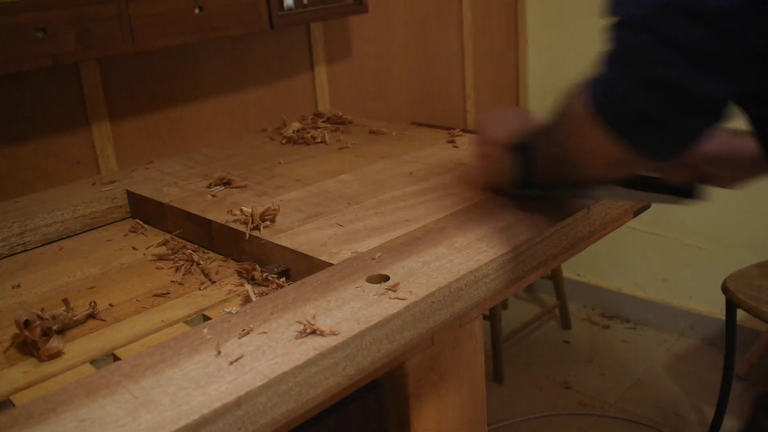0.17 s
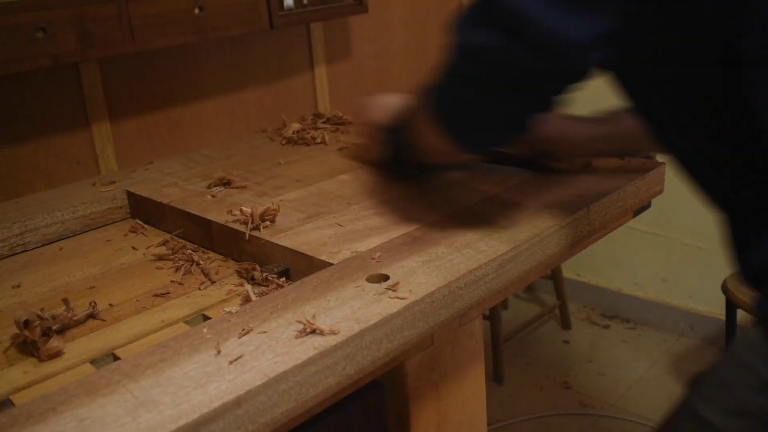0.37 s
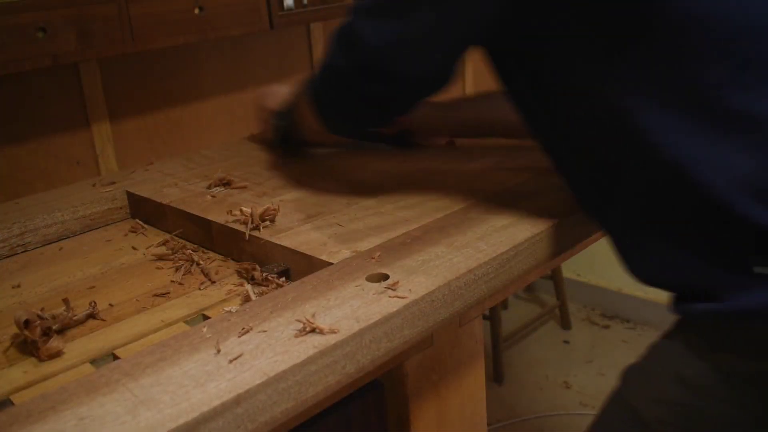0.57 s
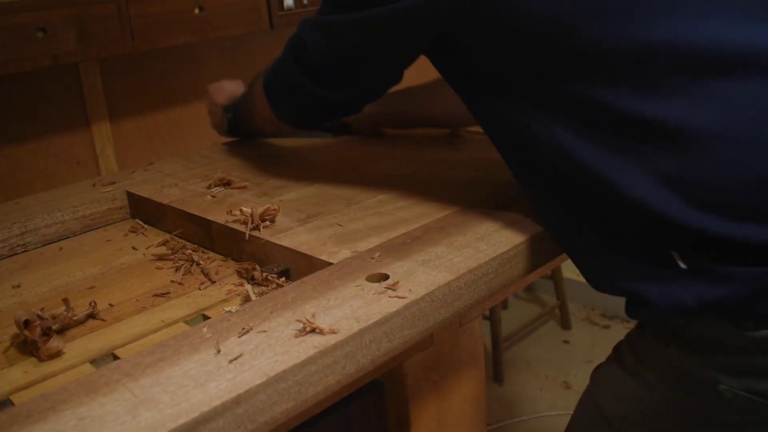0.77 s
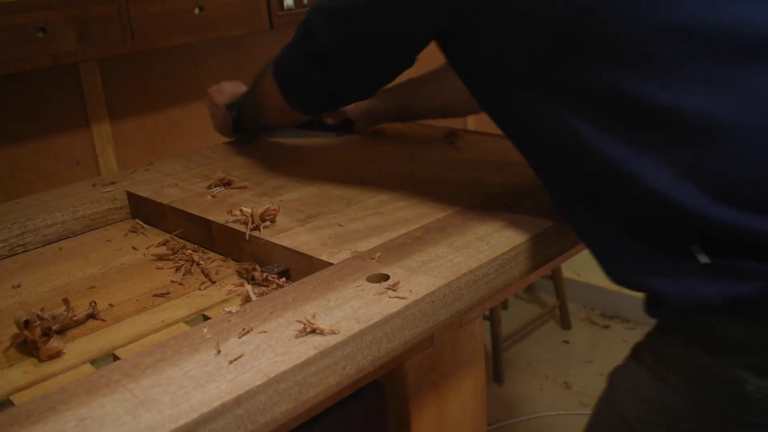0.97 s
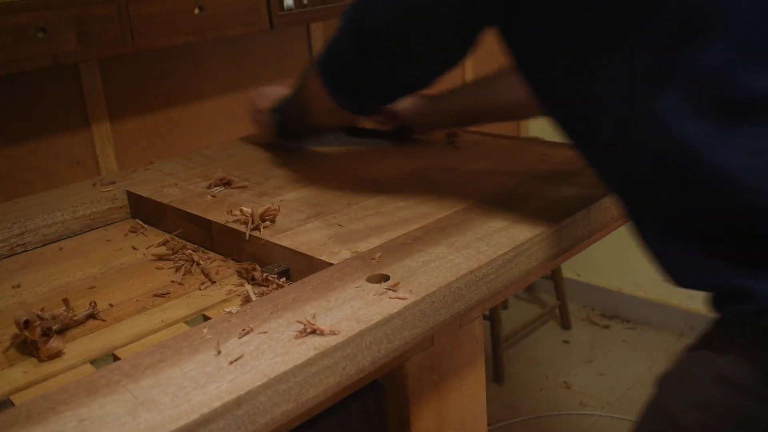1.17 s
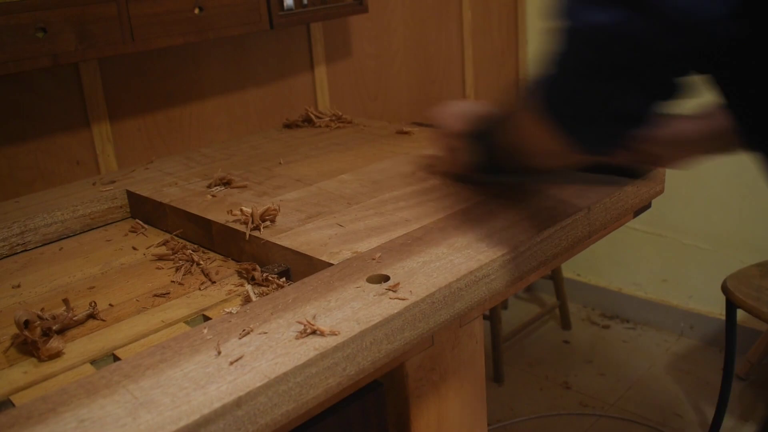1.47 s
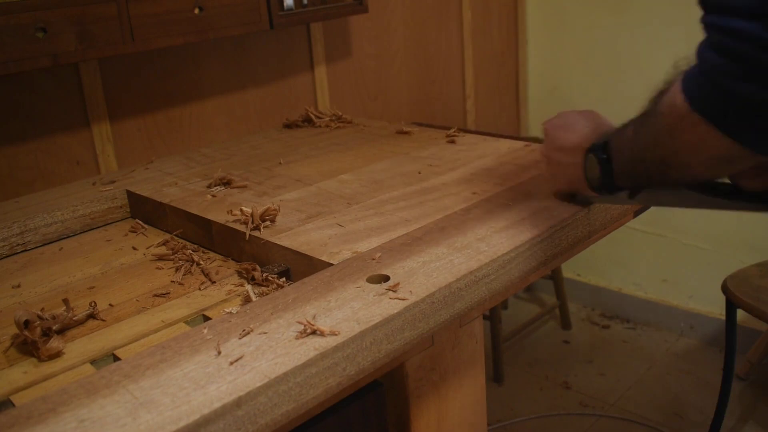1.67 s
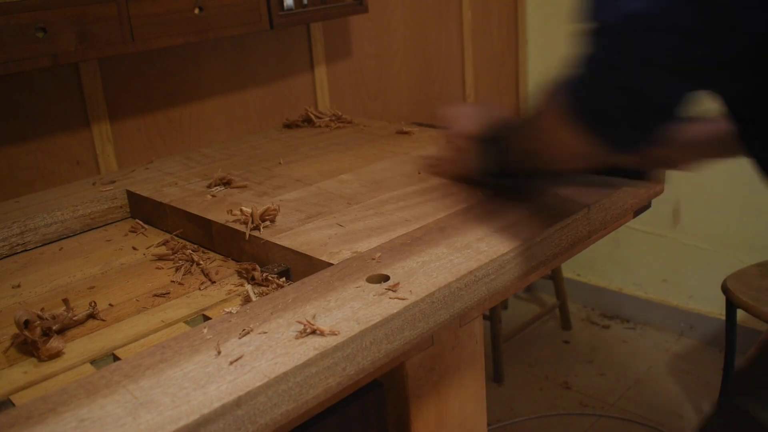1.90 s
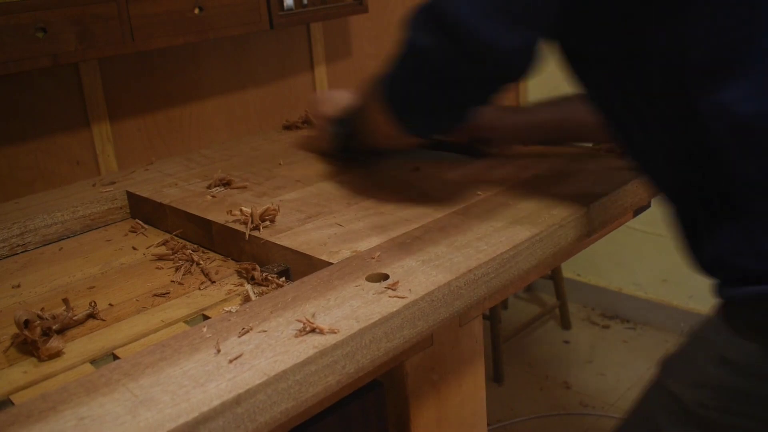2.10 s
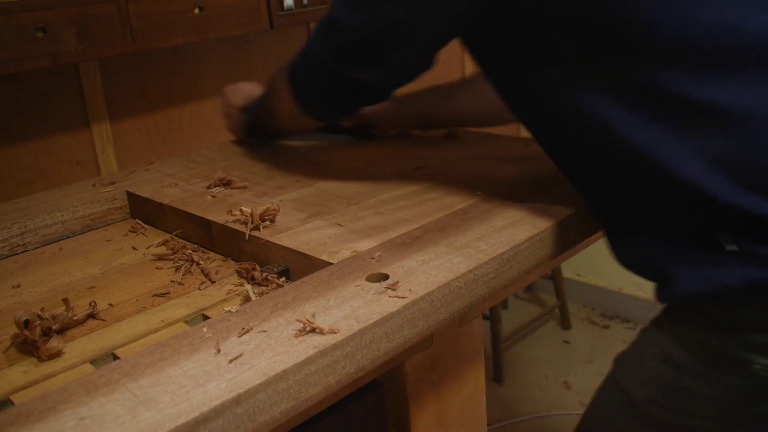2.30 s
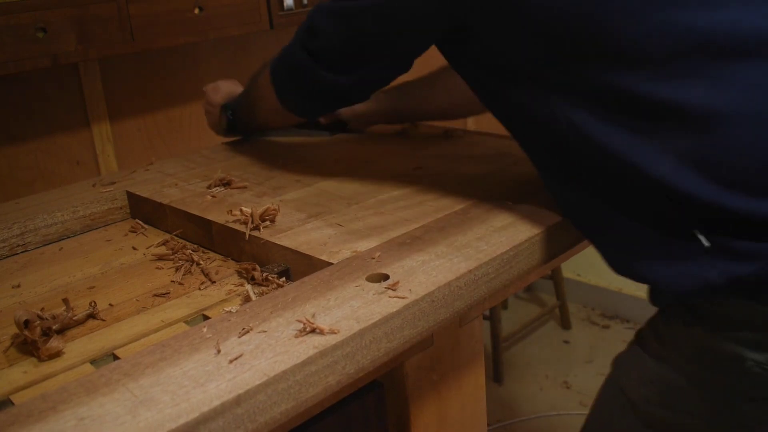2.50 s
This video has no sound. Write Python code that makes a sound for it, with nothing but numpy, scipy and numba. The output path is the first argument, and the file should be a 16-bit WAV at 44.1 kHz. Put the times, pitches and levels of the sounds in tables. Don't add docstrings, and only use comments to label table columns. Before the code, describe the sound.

Close in a small woodworking shop, a plane makes a rough cutting push, nearly stops, drags back with dull clunks, and bites again; chattering boards ring, shavings hiss, and a clear knock lands before the end.

```python
import sys
import numpy as np
from scipy import signal
from scipy.fft import rfft, irfft
from scipy.io import wavfile
from scipy.ndimage import uniform_filter1d
from numba import njit

SR = 44100
rng = np.random.default_rng(int(sys.argv[2]) if len(sys.argv) > 2 else 0)


def rack_gain(trim_db):
    fader = np.asarray(trim_db, float)
    return 10 ** (fader / 20)


def master(y):
    cut = np.clip(np.atleast_2d(y).T, -1, 1)
    pcm = np.round(cut * 32767)
    wavfile.write(sys.argv[1], SR, pcm.astype(np.int16))


N = 116865
T = np.arange(N) / SR

# (time [s], slide level [dB], bite of the iron [dB],
# chatter pitch [Hz], chatter level [dB], sole rumble [dB])
PUSH_STROKE = [
    (0, -30.5, -46, 800, 5.5, 1.5),
    (.06, -39, -37, 850, -2, 12),
    (.17, -36.5, -20.5, 1080, 6, -3),
    (.24, -27, -25.5, 930, 1.5, -17),
    (.4, -27.5, -21.5, 890, -1, -10.5),
    (.58, -26, -19, 1110, -9, -8),
    (.73, -30.5, -23, 890, -2.5, 1.5),
    (.88, -39.5, -31, 880, -9, 3.5),
    (1.0, -70, -27, 840, -9, -3),
]
DRAW_STROKE = [
    (1.04, -48, -28, 900, -3, -7),
    (1.099, -39, -30, 930, -4, -10),
    (1.19, -30.5, -35.5, 990, -2, -14),
    (1.24, -37.5, -25, 750, 3, 0),
    (1.3, -30.5, -28, 740, 0, -1),
    (1.4, -28, -28.5, 735, -10.5, -3),
    (1.55, -29, -29, 1190, -3.5, -3.5),
    (1.67, -30.5, -38, 780, -1, 3),
    (1.79, -45, -38, 850, 4.5, 8.5),
]
SECOND_PUSH = [
    (1.87, -35.5, -32, 830, 1, 2.5),
    (1.95, -30.5, -22.5, 920, 2.9, 4.5),
    (2.04, -29.5, -20.5, 1010, 1.5, 1),
    (2.12, -28.5, -20.5, 920, 1, -12.5),
    (2.23, -27, -24, 1010, -1, -4.5),
    (2.34, -29.5, -24.5, 820, -7, 1.5),
    (2.42, -32.5, -28.5, 940, -4.5, 1),
    (2.56, -46.5, -29, 920, 1, -9),
    (2.65, -94, -28, 800, 6, 1),
]


def strokes():
    rows = np.vstack([PUSH_STROKE, DRAW_STROKE, SECOND_PUSH])
    slide_db, bite_db, chatter_hz, chatter_db, rumble_db = [np.interp(T, rows[:, 0], c) for c in rows[:, 1:].T]
    force = rack_gain(slide_db)
    bite_db = bite_db + 24.5
    lift_db = -9 * near_lifts(width_s=0.022)
    flutter_db = 1.8 * walk(22)
    cut_db = bite_db + lift_db

    slide = sole_slide(np.minimum(cut_db, 3) + flutter_db) + seam_crest(flutter_db)
    boards = board_chatter(force, chatter_hz, chatter_db, rumble_db)
    sway = bench_sway(force * rack_gain(bite_db))
    hiss, other_hiss = shaving_hiss(force, cut_db + flutter_db)
    return force * slide + sway + boards + catches() + hiss, other_hiss


def ticks():
    per_s, scatter_db, most_db, flicker_db = 12000, 2.5, 9, 1.0
    chance, sign, height = rng.random((3, N))
    height_db = np.minimum(-scatter_db * np.log(1 - height), most_db)
    clicks = (chance < per_s / SR) * np.sign(sign - 0.5) * rack_gain(height_db)
    return level(clicks * rack_gain(flicker_db * walk(24.22)), 0)


# (frequency [Hz], level per Hz [dB])
SLIDE_COLOUR = [(59, -67), (100, -69), (220, -14), (342, -51), (450, -12.5), (603, -10.5), (854, -10),
                (3910, -24), (8000, -39.5), (10400, -51), (17600, -120)]
# (frequency [Hz], level [dB], decay time T60 [s])
IRON_MODES = [(1285, 6.5, 0.04), (1433, 8.5, 0.053), (1521, 7, 0.044), (1681, 9, 0.057), (1861, 4, 0.024),
              (2080, 6, 0.046), (2326, 3, 0.037), (2690, 1, 0.061), (2770, -30, 0.035), (3730, -5, 0.021)]


def sole_slide(treble_db):
    scrape = highpass(ripple(colour(ticks(), SLIDE_COLOUR)), 150)
    treble = signal.sosfiltfilt(signal.butter(2, 4630, "high", fs=SR, output="sos"), scrape)
    iron = level(ring(ticks(), IRON_MODES, walk_db=1.5), -2.5)
    return scrape - treble * (1 - rack_gain(treble_db)) + iron


LIFT_TIMES = [.645, 2.283]


def near_lifts(width_s, lead_s=0.0):
    return sum(np.exp(-((T - s + lead_s) / width_s) ** 2) for s in LIFT_TIMES)


def seam_crest(flutter_db):
    hz, width = 3230, 1870
    bright = level(band(band(ticks(), hz, width), hz, width), -6.5)
    return near_lifts(width_s=0.04, lead_s=0.09) * rack_gain(flutter_db) * bright


# (frequency [Hz], level [dB], decay time T60 [s])
BOARD_MODES = [(129, -8.5, 0.27), (189, -7, 0.31), (241, 3, 0.16), (291, -4, 0.02), (438, 6.5, 0.07),
               (560, 1.5, 0.038), (700, 5.5, 0.078), (800, 0.5, 0.07), (871, 1.5, 0.11), (940, 4.5, 0.14),
               (1053.4, 6.5, 0.1), (1130, 0.5, 0.087), (1151.4, 11, 0.17), (1210, 2.5, 0.058)]


def board_chatter(force, chatter_hz, chatter_db, rumble_db):
    width = 500.0

    def chatter():
        return level(svf(svf(ticks(), chatter_hz, width), chatter_hz, width), 0)

    tear = ticks()
    bench_db = -6.5 + 15
    rumble = level(band(tear, 330, 300) + rack_gain(bench_db) * band(tear, 106, 114), 0)
    drive = (chatter() * rack_gain(chatter_db) + rumble * rack_gain(rumble_db)) * force
    loudness = np.std(ring(chatter(), BOARD_MODES))
    return ring(drive, BOARD_MODES, walk_db=1.5) / loudness


# (frequency [Hz], level per Hz [dB])
SHAVING_COLOUR = [(2060, 2), (3500, 0.5), (5720, -17.5), (11500, -23), (14200, -27), (15500, -36)]


def shaving_hiss(force, cut_db):
    grit_db = 2.2 * walk(11.14)
    bite = force * rack_gain(-9 + cut_db + grit_db)
    return [bite * ripple(colour(ticks(), SHAVING_COLOUR)) for _ in range(2)]


def bench_sway(push):
    return push * level(band(rng.standard_normal(N), 35, 50), -40)


# (start [s], length [s], pitch
# [Hz], level [dB])
CATCH_EVENTS = [(0.145, 0.055, 1676, -35), (0.198, 0.09, 700, -25), (0.262, 0.042, 1118, -23),
                (0.331, 0.12, 869, -25.5), (0.361, 0.025, 1148, -25), (0.5, 0.12, 2690, -37.5),
                (0.517, 0.028, 1400, -53), (1.138, 0.08, 980, -40), (1.457, 0.049, 1100, -28.5),
                (1.507, 0.047, 1105, -29.5), (1.522, 0.067, 1553, -34), (1.617, 0.053, 1200, -30),
                (1.545, 0.02, 1155, -29.5), (1.637, .04, 700, -36), (1.84, .03, 1177, -39),
                (1.84, 0.065, 238, -32.5), (1.911, 0.023, 700, -25.5), (1.928, 0.12, 1130, -31),
                (1.936, 0.19, 872, -31), (1.993, 0.035, 2080, -34.5), (2.147, 0.06, 1210, -32),
                (2.328, 0.021, 1080, -30), (0, 0.013, 1117, -26.5), (0.604, 0.01, 978, -17.5),
                (0.63, 0.016, 396, -27.5), (0.672, 0.032, 412, -24), (0.723, .06, 440, -33.5),
                (0.387, 0.075, 700, -33), (0.464, 0.12, 870, -37.5), (0.945, 0.034, 430, -52),
                (1.0, 0.095, 700, -53), (1.837, 0.044, 700, -37), (1.265, .03, 255, -29.5),
                (1.266, 0.022, 437, -27.5), (1.308, 0.033, 547, -30.5), (1.373, 0.028, 543, -24),
                (2.02, 0.046, 1095, -35), (2.259, 0.023, 700, -25), (2.261, 0.033, 420, -27.5),
                (2.322, 0.048, 435, -25), (2.256, 0.028, 255, -29), (1.957, 0.053, 440, -34),
                (2.358, 0.011, 1120, -29), (2.389, 0.042, 426, -29.5), (2.442, 0.061, 435, -34.5),
                (2.103, 0.062, 854, -33), (0.274, .02, 1146, -27.5), (1.55, 0.047, 1700, -35)]


def catches():
    width_hz, edge_s, steadiness = 55, 0.012, 0.8
    out = 0
    tear = ticks()
    for start, length, hz, db in CATCH_EVENTS:
        fade_out = (start + length - T) / 2 + edge_s
        env = np.clip(np.minimum(T - start, fade_out) / edge_s, 0, 1)
        tone = level(band(band(tear, hz, width_hz), hz, 3 * width_hz), 0)
        waver = np.sqrt(uniform_filter1d(tone ** 2, size=SR // 100) + 0.066)
        out = out + env * level(tone / waver ** steadiness, db)
    return out


# (time [s], peak level [dB], pitch [Hz], rattle decay [s], crack level [dB])
KNOCK_EVENTS = [(-.004, -17.5, 525, 0.06, 0), (.208, -21, 900, .02, -2), (0.509, -22.5, 860, .02, -3),
                (.611, -13, 400, 0.012, 2.5), (.617, -8.5, 376, 0.046, -8), (.641, -13, 400, .03, -18),
                (.712, -19, 415, .01, -1), (2.268, -15, 700, 0.035, -15), (.686, -19.5, 387, 0.04, -30),
                (1.163, -29, 700, 0.058, -20), (1.258, -17.5, 400, 0.023, -10),
                (1.272, -16, 440, 0.023, -20), (1.328, -18.5, 510, 0.06, -27),
                (1.384, -19.5, 560, 0.016, -27), (1.603, -15.5, 600, 0.063, -16),
                (1.647, -23, 650, 0.075, -9), (1.822, -20, 690, 0.02, -14), (1.851, -40, 240, 0.042, -14),
                (2.252, -9, 385, 0.04, 0.5), (2.258, -16.5, 432, 0.071, -12),
                (2.328, -20.5, 430, 0.056, -30), (2.41, -22, 438, 0.068, -32)]


def knocks():
    blow_s, crack_s, rattle_db, thud_db = 0.0012, 0.006, -7, -6.5
    lead = SR // 10
    out, t = np.zeros(2 * N), np.arange(SR // 2) / SR
    for s, db, hz, rattle_s, crack_db in KNOCK_EVENTS:
        rattle_noise, crack_noise = rng.standard_normal((2, len(t)))
        blow = np.sin(np.pi * np.clip(t / blow_s, 0, 1))
        push = blow + rack_gain(rattle_db) * rattle_noise * np.exp(-t / rattle_s)
        thud = rack_gain(thud_db) * band(push, 218, 95)
        wood = ring(band(push, hz, 450) + thud + 0.033 * push, BOARD_MODES)
        crack = crack_noise * np.exp(-t / crack_s) * np.clip(t / 0.003, 0, 1)
        for _ in range(3):
            crack = band(crack, 1250, 1400)
        i = int(s * SR) + lead
        out[i:i + len(t)] += rack_gain(db) * (wood / abs(wood).max() + rack_gain(crack_db) * crack / abs(crack).max())
    return out[lead:lead + N]


def room(near):
    lags = np.array([613, 797, 941, 1163, 1327, 1559, 1741, 1987])
    return rack_gain(-7.5) * walls(near, lags, rack_gain(-60 * lags / SR / 0.39), 0.17)


@njit
def walls(x, lags, gain, damp):
    line, soft, out = np.zeros((8, 4096)), np.zeros(8), np.zeros(len(x))
    for i in range(len(x)):
        total = 0.
        for k in range(8):
            soft[k] += (1 - damp) * (gain[k] * line[k, (i - lags[k]) & 4095] - soft[k])
            total += soft[k]
            out[i] += soft[k] * (1 - 2 * (k % 2)) / 3
        for k in range(8):
            line[k, i & 4095] = x[i] + soft[k] - total / 4
    return out


# (frequency [Hz], level per Hz [dB])
SHOP_COLOUR = [(15, -75), (25, -49), (79, -15), (169, 1), (410, 4.5), (482, -10), (665, 1.5), (3000, -15.5),
               (15500, -57)]


def shop_air():
    return level(colour(rng.standard_normal(N), SHOP_COLOUR), -39)


def level(x, db):
    return x * rack_gain(db) / np.sqrt(np.mean(x ** 2))


def walk(rate):
    hold = int(SR / rate)
    steps = np.repeat(rng.standard_normal(N // hold + 1), hold)
    return 0.91 * uniform_filter1d(uniform_filter1d(steps, hold), hold)[:N]


def ring(x, modes, walk_db=0):
    out = 0
    for k, (hz, db, t60) in enumerate(modes):
        r = np.exp(-np.log(1000) / (t60 * SR))
        fed = x * rack_gain(walk_db * walk(8.68)) if walk_db else x
        poles = [1, -2 * r * np.cos(2 * np.pi * hz / SR), r * r]
        out = out + (-1) ** k * rack_gain(db) * (1 - r) * signal.lfilter([1, 0, -1], poles, fed)
    return out


def ripple(x):
    db = 2.5 * np.clip(rng.standard_normal(2000), -2, 2)
    comb_db = np.interp(np.fft.rfftfreq(N, 1 / SR) / 61.14, np.arange(len(db)), db)
    return level(irfft(rfft(x) * rack_gain(comb_db), N), 0)


def colour(x, table):
    hz, db = np.array(table).T
    log_hz = np.log(np.fft.rfftfreq(N, 1 / SR) + 1)
    return irfft(rfft(x) * rack_gain(np.interp(log_hz, np.log(hz), db, left=db[0] - 44)), N)


@njit
def svf(x, hz, width):
    y, b, l = np.empty(len(x)), 0., 0.
    for i in range(len(x)):
        g, k = np.tan(np.pi * hz[i] / SR), width / hz[i]
        v = (b + g * (x[i] - l)) / (1 + g * (g + k))
        b, l, y[i] = 2 * v - b, l + 2 * g * v, k * v
    return y


def band(x, hz, width):
    return svf(x, np.full(len(x), 1. * hz), 1. * width)


def highpass(x, hz):
    return signal.sosfilt(signal.butter(2, hz, "high", fs=SR, output="sos"), x)


def scene():
    plane, other_hiss = strokes()
    near = plane + knocks()
    mid = near + room(near) + shop_air()
    side = rack_gain(-5) * band(other_hiss + shop_air(), 7740, 6900)
    side = side + rack_gain(-54) * band(rng.standard_normal(N), 30, 41)
    side = side + rack_gain(-34) * band(np.roll(mid, 300), 250, 500)
    left_db = 2.5
    return mid * rack_gain(np.array([[left_db / 2], [-left_db / 2]])) + side * np.array([[1], [-1]])


@njit
def duck(x, top, ratio, release):
    g, e = np.empty(len(x)), 0.
    for i in range(len(x)):
        e += (abs(x[i]) - e) * (.02 if abs(x[i]) > e else release)
        g[i] = min(1., (top / (e + 1e-9)) ** (1 - 1 / ratio))
    return g


def top_cut(x):
    return signal.sosfilt(signal.butter(12, 15630, fs=SR, output="sos"), x)


def record(dry):
    gain = duck(dry.mean(axis=0), rack_gain(-12), 2.0, 1 / (0.03 * SR))
    x = highpass(dry * gain, 90)
    clip = 0.75
    return top_cut(clip * np.tanh(x / clip))


dry = scene()
out = record(dry)
master(out)
```